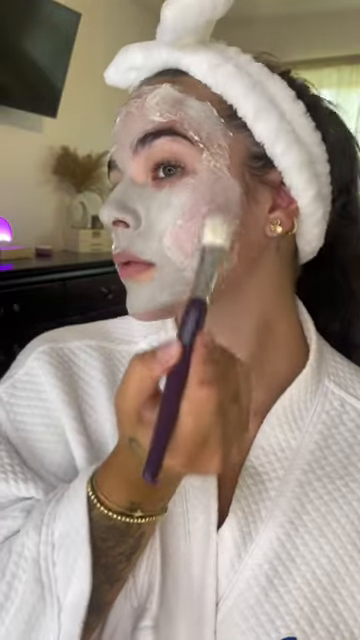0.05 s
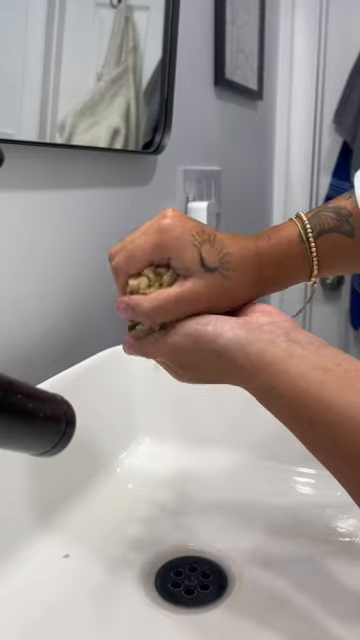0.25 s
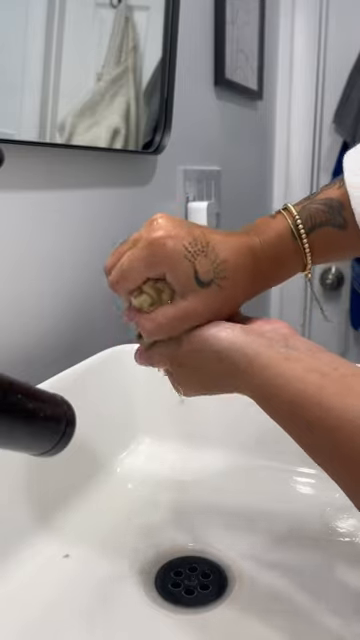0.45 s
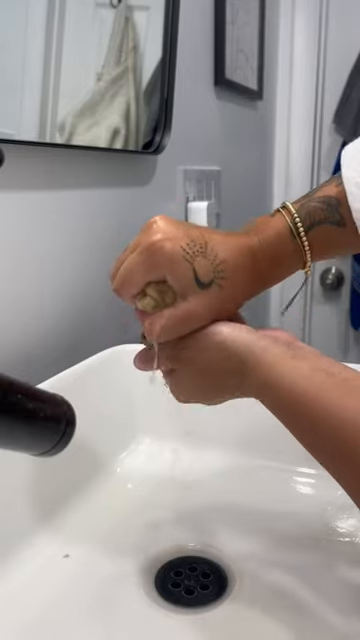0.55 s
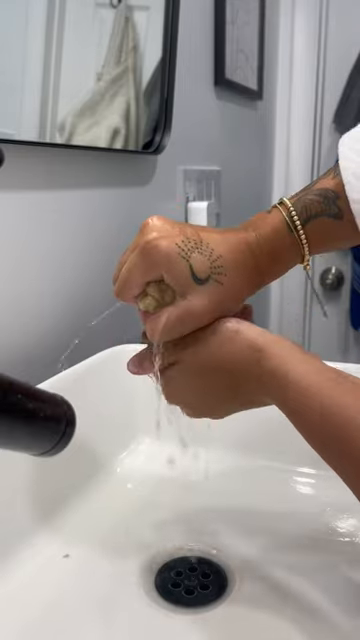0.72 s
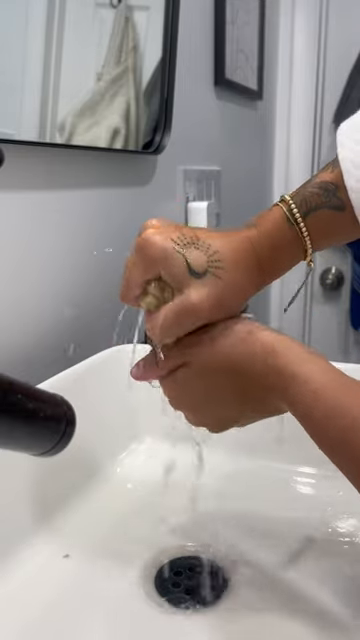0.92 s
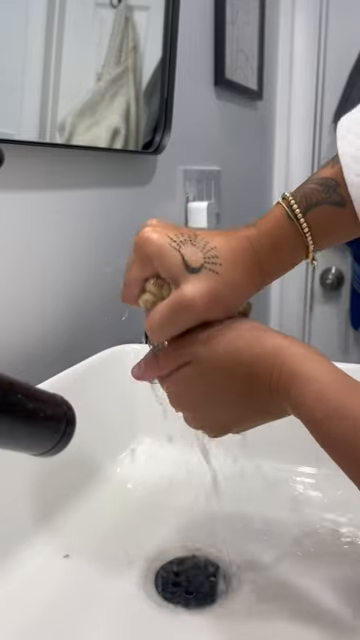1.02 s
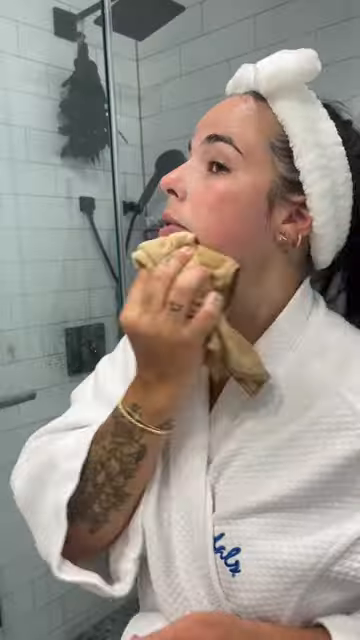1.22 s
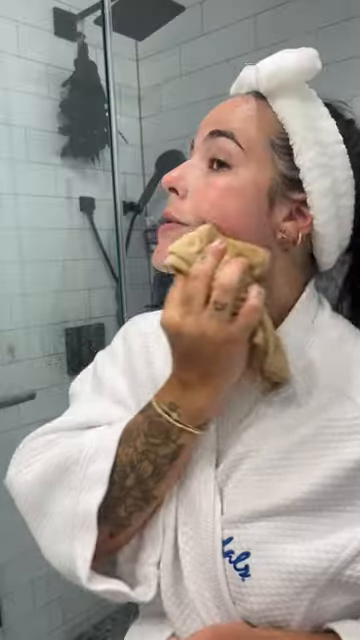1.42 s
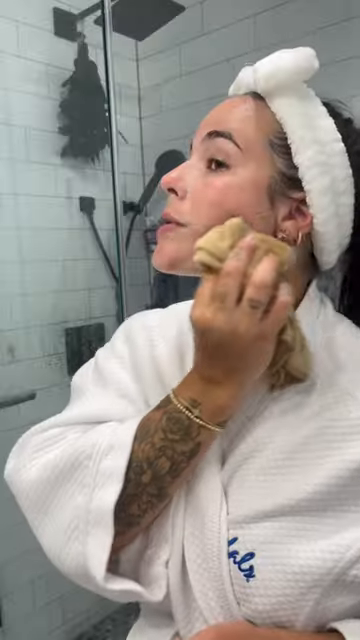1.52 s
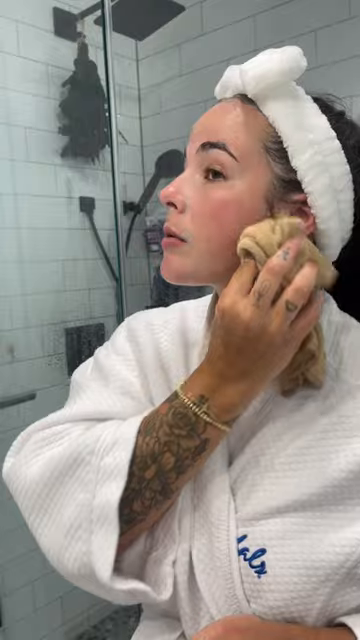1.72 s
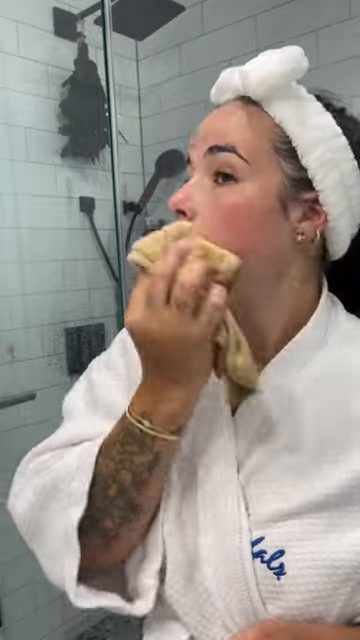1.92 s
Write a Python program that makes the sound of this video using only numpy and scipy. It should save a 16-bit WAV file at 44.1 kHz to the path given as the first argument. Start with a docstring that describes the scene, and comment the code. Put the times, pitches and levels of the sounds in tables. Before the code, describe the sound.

A wet cloth is wrung out, water spattering into a sink, then faint wiping.

```python
"""A wet cloth fizzes as it is wrung out and air and water are pressed through its weave.
Water gurgles off the hands and spatters on a ceramic basin: impacts ring, trapped bubbles
resonate and the bowl drums softly, over a low ventilation hum. After a cut, the cloth
wipes over skin with a faint friction noise in a humming, tiled room."""
import sys
import numpy as np
from scipy import signal
from scipy.fft import rfft, irfft
from scipy.io import wavfile

SR = 44100
rng = np.random.default_rng(int(sys.argv[2]) if len(sys.argv) > 2 else 0)


def bounce(signal):
    """Save signal as a 16-bit WAV file at the path given by the first command-line argument."""
    frames = np.transpose(np.atleast_2d(signal))
    limited = np.clip(frames, -1, 1)
    pcm = np.round(limited * 32767).astype(np.int16)
    wavfile.write(sys.argv[1], SR, pcm)


N = 85995
START_S, CUT_S = 0.1959, 1.27  # the wringing begins; the wiping takes over
DROP_RISE_S, BUBBLE_RISE_S = 0.00013, 0.0034


def fizz():
    """Superposition: air and water pressed through the weave make tiny rings that merge into a hiss."""
    # squeezing of the cloth (time [s], level [dB])
    envelope = [(.19, -58.5), (.27, -47.5), (.3, -48), (.35, -45.5), (.45, -45), (.52, -45.5), (.58, -47.5),
                (.62, -56), (.66, -58.5), (.75, -72)]
    # tone of the weave (frequency [Hz], gain [dB])
    spectrum = [(1000, -28.5), (2500, -9.5), (4000, -3.5), (5000, -0.5), (6500, 0.5), (8200, 0), (9400, -3),
                (10700, 1), (12000, -13), (13500, -43.5)]
    pops = grains(per_s=9000, spread_db=3.5, cycles=23, low_hz=2380, high_hz=13120)
    return evened(colour(pops, spectrum)) * level(envelope)


def gurgle():
    """Damped oscillation: sparser, lower rings overlap as the water runs."""
    # running water (time [s], level [dB])
    envelope = [(.19, -62.5), (.33, -52), (.5, -52.5), (.605, -51.5), (.64, -62), (.75, -59), (.79, -50),
                (.825, -47.5), (.87, -50), (.91, -56.5), (1, -59.5), (1.1, -62), (1.27, -67.5)]
    # tone of the flow (frequency [Hz], gain [dB])
    spectrum = [(300, -13), (600, -10.5), (1000, -5.5), (1400, -5), (1900, 0.5), (2700, -1), (3400, -1),
                (4500, -9), (7000, -29.5)]
    rings = grains(per_s=2500, spread_db=2.5, cycles=16, low_hz=500, high_hz=4500)
    return evened(colour(rings, spectrum)) * level(envelope)


def drops():
    """Impact excitation: each drop slaps the ceramic with a broadband burst and rings briefly."""
    # impacts (time [s], pitch [Hz], ring level [dB], ring t60 [s], slap level [dB])
    impacts = [(0.2234, 2680, -29, 0.037, -21.5), (0.2235, 2200, -27, 0.0076, -27),
               (.6705, 10600, -38, 0.0053, -34.5), (0.6766, 5360, -22.5, 0.0021, -22.5),
               (.6775, 7840, -21, 0.0024, -19.5), (.7512, 2600, -33.5, 0.0088, -20),
               (.7520, 8000, -21.5, 0.0031, -21), (0.767, 6400, -41, 0.0024, -29.5),
               (0.8192, 11100, -26, 0.0037, -28.5), (0.823, 6400, -33, 0.0057, -32),
               (.8762, 2370, -37.5, 0.01, -35.5), (0.889, 7340, -12, 0.0022, -22.5),
               (0.9154, 4300, -21, 0.0036, -35.5), (.9162, 3400, -28.5, .005, -40),
               (0.927, 5040, -30.5, 0.0116, -49), (0.9654, 6130, -28.5, .006, -40),
               (0.9675, 2550, -32.5, .007, -26), (.988, 3800, -26.5, 0.0033, -21.5),
               (.9965, 5200, -31, 0.0073, -29.5), (1.0002, 10660, -24, .005, -21),
               (1.0095, 6300, -34.5, .005, -33.5), (1.028, 9830, -16.5, .004, -20.5),
               (1.0395, 5440, -35.5, 0.0045, -33.5), (1.052, 10740, -30, 0.0069, -29.5),
               (1.053, 7100, -40, .004, -29.5), (1.102, 10650, -27.5, .004, -24.5),
               (1.0755, 5300, -34.5, .005, -36), (1.1085, 5840, -32, 0.0026, -34),
               (1.122, 4600, -36.5, .005, -38), (1.173, 5800, -35.5, .005, -37.5),
               (1.1469, 10370, -27, .004, -29), (1.1795, 10990, -28.5, .004, -27),
               (1.1919, 10490, -12, 0.0028, -24.5), (1.2252, 6480, -37.5, .005, -33.5),
               (1.2324, 3270, -42.5, 0.0053, -37)]
    # tone of a slap (frequency [Hz], gain [dB])
    spectrum = [(300, -31.5), (1000, -23), (2500, -18.5), (5000, -9), (8000, -3.5), (9400, 0.5), (10600, 5),
                (12000, -9.5), (13500, -31)]
    out = np.zeros(N)
    t = np.arange(512) / SR
    for s, hz, db, t60, slap_db in impacts:
        burst = rng.standard_normal(len(t)) * np.exp(-t / 0.00047)
        slap = colour(burst, spectrum)
        add(out, s, bowl(amp(slap_db) * slap / abs(slap).max()))
        add(out, s, bowl(ring(hz, db, t60, DROP_RISE_S)))
    return out


def spray():
    """Shot noise: fine droplets strike the ceramic at random instants."""
    # spattering (time [s], level [dB])
    envelope = [(.66, -71), (.69, -43), (.74, -54.5), (.78, -45.5), (.83, -41), (.87, -46.5), (.9, -45.5),
                (.95, -46), (1, -38.5), (1.08, -46), (1.12, -48), (1.165, -51.5), (1.23, -48), (1.27, -49)]
    # tone of the droplets (frequency [Hz], gain [dB])
    spectrum = [(1500, -28.5), (3000, -18.5), (4500, -8.5), (6500, -7), (8200, -3.5), (9400, -4),
                (10700, 3.5), (12000, -7.5), (13500, -33)]
    droplets = grains(per_s=2200, spread_db=4.0, cycles=13, low_hz=2500, high_hz=12820)
    return evened(colour(droplets, spectrum)) * level(envelope)


def bubbles():
    """Bubble resonance: trapped air is a spring against the mass of the water around it."""
    # trapped air bubbles (time [s], pitch [Hz], level [dB], t60 [s])
    resonances = [(.556, 3200, -41.5, .03), (.598, 3260, -43.5, .035), (.776, 2870, -39.5, .03),
                  (.795, 2760, -35.5, 0.02), (.811, 990, -46.5, 0.033), (.815, 842, -46.5, .025),
                  (.835, 550, -50, .03), (0.83, 2670, -33.5, .018)]
    out = np.zeros(N)
    for s, hz, db, t60 in resonances:
        add(out, s, ring(hz, db, t60, BUBBLE_RISE_S))
    return out


def drumming():
    """Forced vibration: the bowl booms softly as water lands in it."""
    # swells of the boom (time [s], level [dB])
    envelope = [(.2, -55.5), (.27, -55), (.33, -45), (.42, -62), (.52, -57), (.6, -55), (.68, -61),
                (.8, -52), (.93, -64), (1, -46), (1.09, -56.5), (1.18, -42), (1.24, -58.5)]
    # low response of the bowl (frequency [Hz], gain [dB])
    spectrum = [(50, -32), (90, -13.5), (120, 1.5), (175, 1.5), (250, -13.5), (400, -29.5), (1000, -63)]
    return evened(colour(rng.standard_normal(N), spectrum, size=8192)) * level(envelope)


def wipe():
    """Friction noise: damp fibres rub over skin, and the tiles reflect the sound."""
    # wiping strokes (time [s], level [dB])
    envelope = [(1.33, -86), (1.41, -77.5), (1.445, -69.5), (1.55, -68.5), (1.63, -75), (1.665, -68),
                (1.71, -84.5), (1.76, -93)]
    # tone of cloth on skin (frequency [Hz], gain [dB])
    spectrum = [(1500, -13.5), (3500, -2), (6000, -6), (8500, 0.5), (10700, 0), (12000, -12.5),
                (13500, -35)]
    # lead of left over right (frequency [Hz], phase [rad])
    lead = [(0, 1), (3000, 1.2), (7000, 1), (8500, 0.7), (10200, -4), (11500, -5.5), (14000, -6.3)]
    fibres = grains(per_s=12000, spread_db=3, cycles=6, low_hz=2000, high_hz=12500, count=24)
    rub = evened(colour(fibres, spectrum)) * level(envelope)
    tiles = np.array([signal.fftconvolve(rub, tail(t60=0.0943, delay_s=0.002))[:N] for _ in range(2)])
    return 0.96 * stereo(rub, lead) + 0.38 * tiles


def bowl(x):
    """Early reflection: the ceramic throws a sound straight back, differently for each spot."""
    response = amp(-5) * tail(t60=0.02, delay_s=0.0008)[:2048]
    response[0] = 1  # direct path
    return signal.oaconvolve(x, response)


def bathroom(x, coherence=0.55):
    """Reverberation: the direct sound is followed by wall reflections, partly alike on both sides."""
    # lead of left over right (frequency [Hz], phase [rad])
    lead = [(0, 0.5), (1900, -1.15), (2700, 1), (3900, 1.3), (4650, 2), (5250, 5.5), (5900, 6.5),
            (9100, 9.5), (11800, 12), (13600, 13)]
    # reflections against the direct sound (frequency [Hz], gain [dB])
    wall_gain = [(500, -1), (2500, -8), (5000, -6.5), (7500, -7), (10500, -13.5), (13000, -14.5)]
    shared, left, right = (signal.fftconvolve(x, tail(t60=0.17, delay_s=0.0033))[:N] for _ in range(3))
    walls = np.sqrt(coherence) * stereo(shared, lead) + np.sqrt(1 - coherence) * np.array([left, right])
    return stereo(x, lead) + np.array([colour(side, wall_gain) for side in walls])


def ventilation(room, waver_rad=0.64):
    """Partly coherent noise and a phase-modulated hum; room 0 has the basin, room 1 the wiping."""
    # air noise at the basin (frequency [Hz], spectral density [dB])
    basin_air = [(20, -99), (40, -86.5), (58, -75), (85, -78), (125, -76.5), (180, -76.5), (300, -83.5),
                 (480, -85.5), (700, -94), (1000, -86.5), (1400, -94.5), (2000, -89.5), (2800, -99),
                 (6000, -112), (13000, -128)]
    # air noise in the tiled room (frequency [Hz], spectral density [dB])
    tiled_air = [(20, -102), (40, -88), (58, -76), (120, -74), (200, -78), (300, -86.5), (370, -79),
                 (480, -90.5), (750, -88), (1000, -87.5), (1400, -94), (2100, -89.5), (2700, -102),
                 (3800, -108), (5000, -118), (7500, -124), (10700, -119), (12000, -126), (13500, -144)]
    # left-right likeness of the air (frequency [Hz], correlation [-1 to 1])
    correlation = [(130, 1), (280, 0.72), (600, -0.039), (1300, .1), (3000, .3), (7000, 0.44), (10000, -.7),
                   (12000, .3)]
    # hum partials (frequency [Hz], level in room 0 [dB], level in room 1 [dB])
    partials = [(58.14, -60, -62.5), (119.9, -54.5, -56), (180, -61, -63), (240, -63.5, -75),
                (354.6, -72, -63), (478, -72.5, -74), (1031, -67.5, -74)]
    hz, t = np.fft.rfftfreq(N, 1 / SR), np.arange(N) / SR
    left, independent = rfft(rng.standard_normal((2, N)))
    alike = read(correlation, hz)
    right = alike * left + np.sqrt(1 - alike ** 2) * independent
    density = amp(read((basin_air, tiled_air)[room], hz))
    out = irfft(np.array([left, right]) * density, N) * np.sqrt(SR / 2)
    for hum_hz, *room_db in partials:
        drift = evened(irfft(rfft(rng.standard_normal(N)) * (hz < 6), N))
        phase = 2 * np.pi * (hum_hz * t + rng.random()) + waver_rad * drift
        out += np.sqrt(2) * amp(room_db[room]) * np.sin(phase)
    return out


def grains(per_s, spread_db, cycles, low_hz, high_hz, count=48):
    """Random impulses of uneven size excite a bank of rings, each falling 60 dB over `cycles` periods."""
    out = np.zeros(N)
    for hz in np.linspace(low_hz, high_hz, count):
        hits = rng.random(N) < per_s / count / SR
        sizes = amp(spread_db * np.minimum(rng.exponential(1, N), 3))
        grain = bowl(ring(hz, 0, cycles / hz, DROP_RISE_S))
        out += evened(signal.oaconvolve(hits * sizes, grain)[:N])
    return evened(out)


def ring(hz, db, t60, rise_s):
    """Damped oscillator whose pitch creeps up, like a bubble nearing the surface."""
    t = np.arange(0, t60 + 4 * rise_s, 1 / SR)
    shape = (1 - np.exp(-t / rise_s)) * np.exp(-np.log(1000) * t / t60)
    return amp(db) * shape / shape.max() * np.sin(2 * np.pi * hz * t * (1 + 0.6 * t))


def tail(t60, delay_s):
    """Diffuse decay: dense random reflections die away exponentially, with unit total energy."""
    t = np.arange(round((1.5 * t60 + delay_s) * SR)) / SR
    signs = rng.choice([-1., 1.], len(t))
    arrivals = (rng.random(len(t)) < 0.25) * (t > delay_s)
    taps = signs * arrivals * np.exp(-np.log(1000) * t / t60)
    return taps / (np.linalg.norm(taps) + 1e-12)


def stereo(x, lead):
    """Phase difference: each frequency reaches left and right with its own shift."""
    phase = np.interp(np.fft.rfftfreq(2 * N, 1 / SR), *np.transpose(lead))
    return irfft(rfft(x, 2 * N) * np.exp(0.5j * np.array([phase, -phase])))[:, :N]


def colour(x, spectrum, size=2048):
    """Minimum-phase filtering: a causal response with the given spectrum."""
    hz = abs(np.fft.fftfreq(size, 1 / SR))
    log_gain = np.log(amp(read(spectrum, hz)))
    response = np.exp(np.conj(signal.hilbert(log_gain)))
    taps = np.fft.ifft(response).real[:size // 2]
    return signal.fftconvolve(x, taps)[:len(x)]


def level(points):
    """Amplitude envelope from a decibel curve."""
    return amp(np.interp(np.arange(N) / SR, *np.transpose(points)))


def read(points, hz):
    """Interpolation on a log-frequency axis."""
    knots_hz, values = np.transpose(points)
    return np.interp(np.log(hz + 1), np.log(knots_hz + 1), values)


def amp(db):
    """Decibels to amplitude ratio."""
    return 10 ** (np.asarray(db) / 20)


def evened(x):
    """Normalisation to unit rms."""
    return x / np.sqrt(np.mean(x ** 2) + 1e-20)


def add(mix, s, sound):
    """Superposition of a sound on the mix, starting at s seconds."""
    part = mix[round(s * SR):][:len(sound)]
    part += sound[:len(part)]


def scene():
    """Sources sum in each room: the wringing, then a hard cut to the wiping."""
    t = np.arange(N) / SR
    before_cut = np.clip((t - START_S) / 0.0017, 0, 1) * np.clip((CUT_S - t) / 0.0023, 0, 1)
    after_cut = np.clip((t - CUT_S) / 0.01, 0, 1)
    water = drops() + bubbles() + fizz() + gurgle() + spray()
    wringing = bathroom(water) + drumming() + ventilation(room=0)
    wiping = (wipe() + ventilation(room=1)) * amp([[1], [-1]])  # leans left
    return before_cut * wringing + after_cut * wiping


def record(dry):
    """Band limiting: a low-pass filter removes the treble above 14 kHz."""
    lowpass = signal.firwin(255, 14000, window=("kaiser", 8), fs=SR)
    return signal.oaconvolve(dry, lowpass[None], "same")


dry = scene()
out = record(dry)
bounce(out)
```